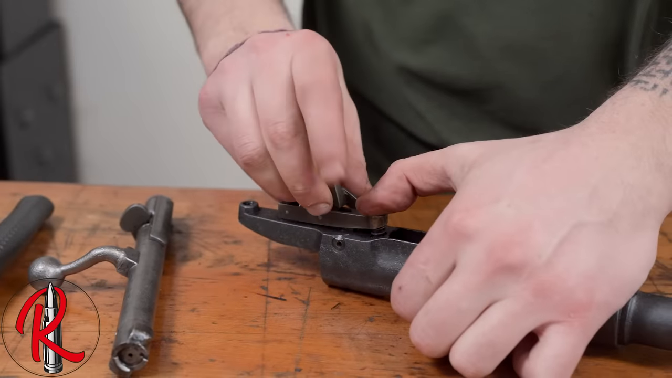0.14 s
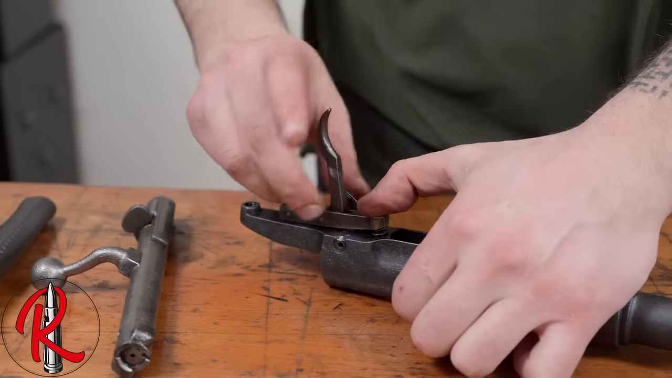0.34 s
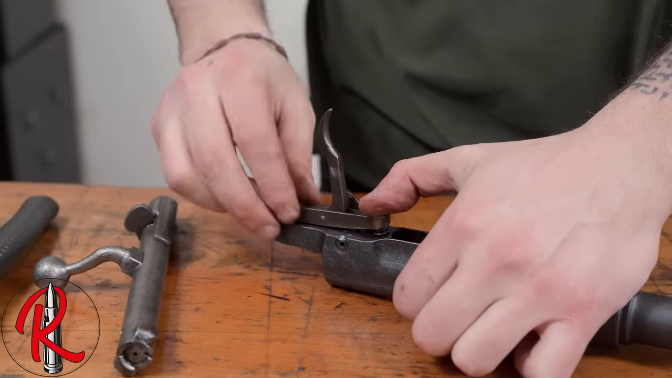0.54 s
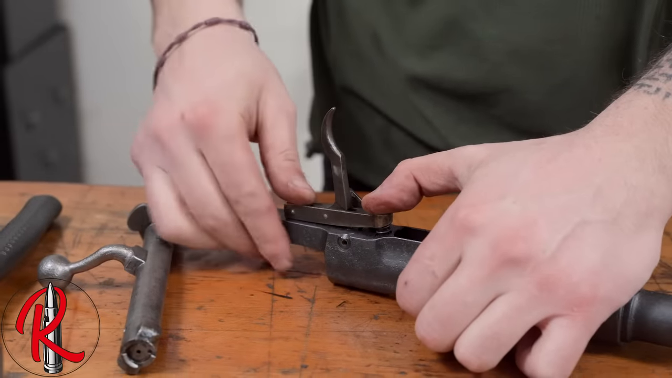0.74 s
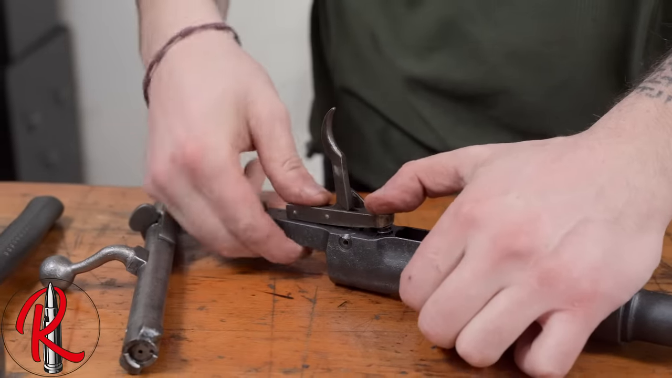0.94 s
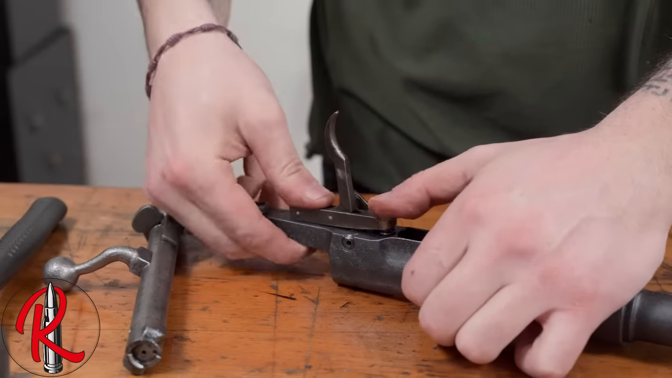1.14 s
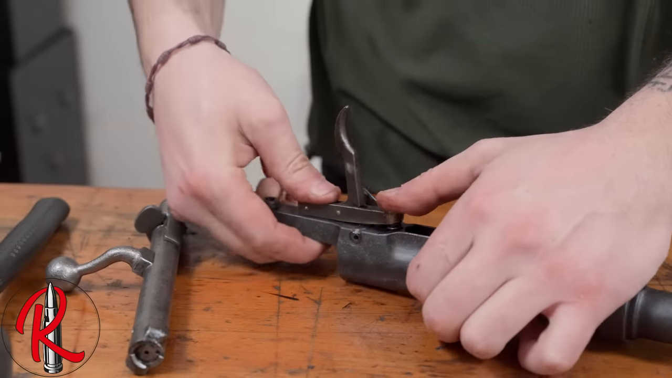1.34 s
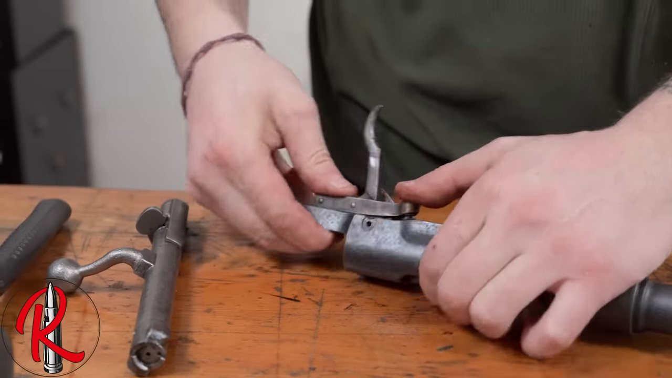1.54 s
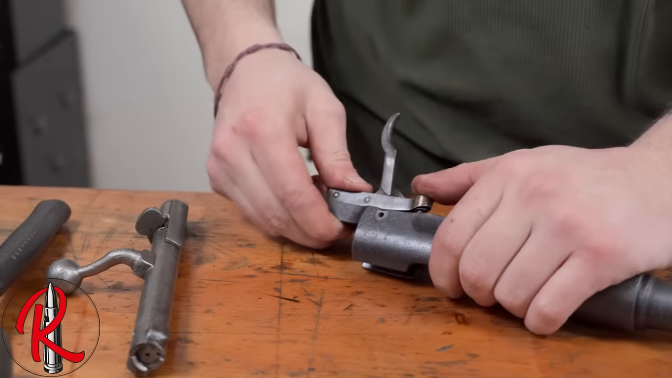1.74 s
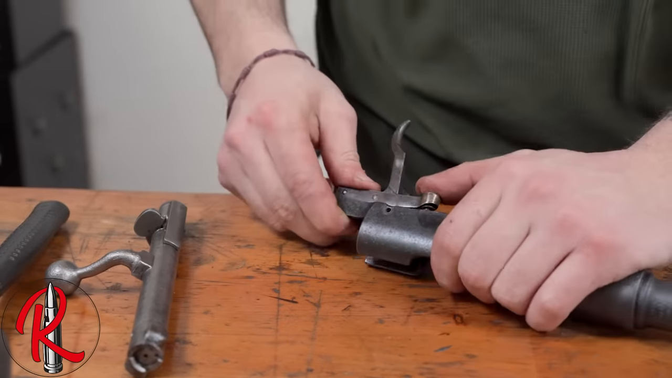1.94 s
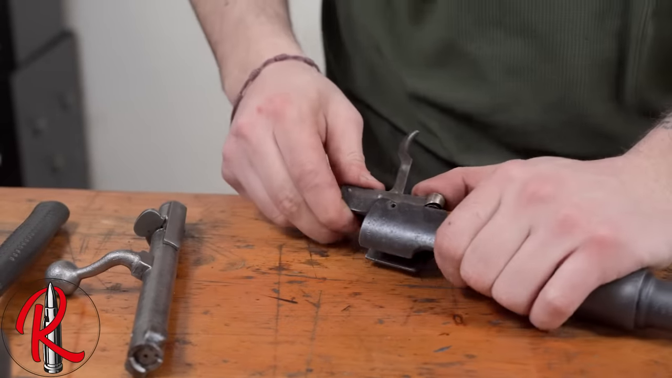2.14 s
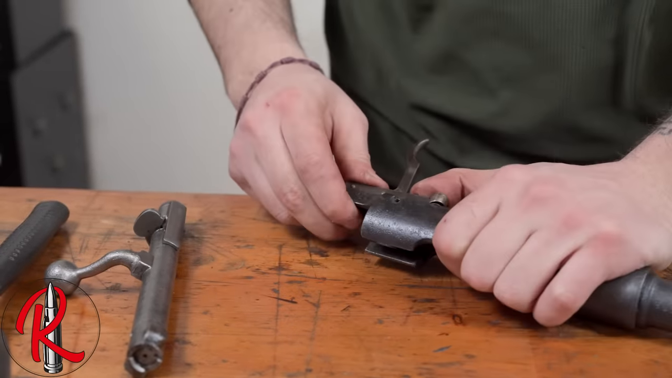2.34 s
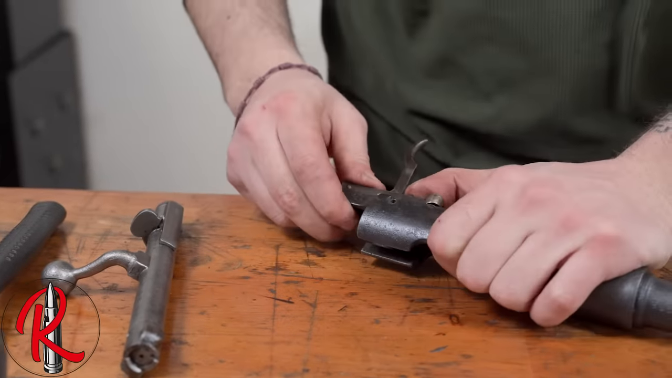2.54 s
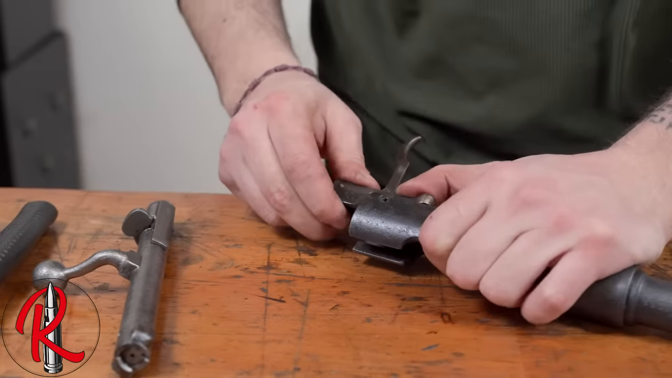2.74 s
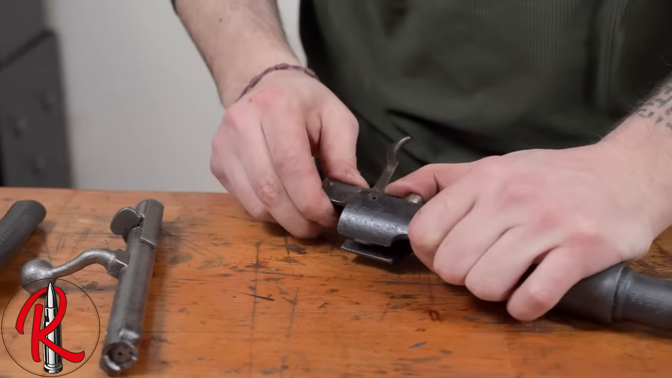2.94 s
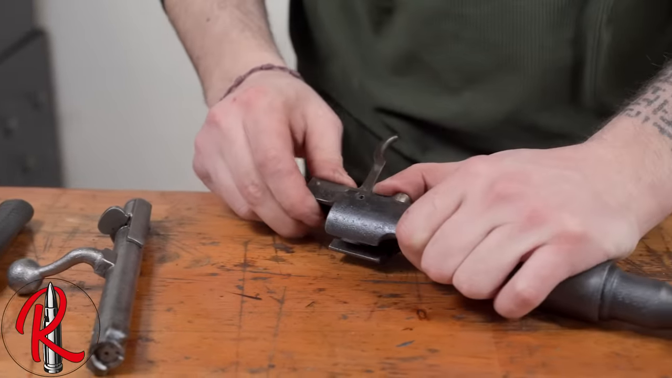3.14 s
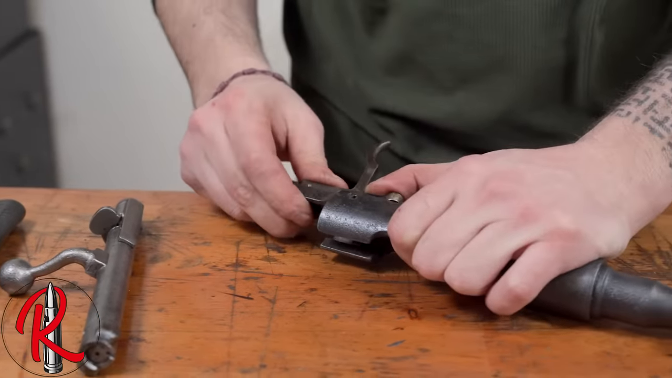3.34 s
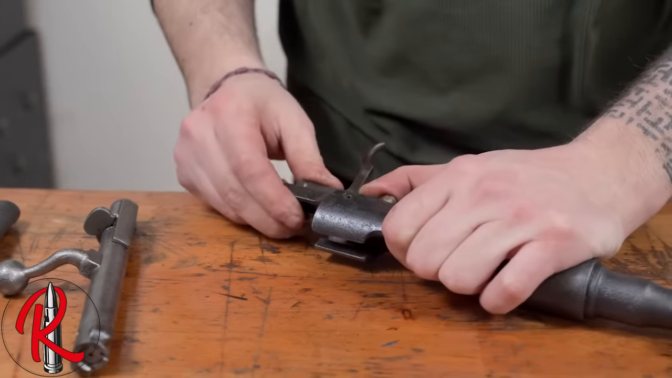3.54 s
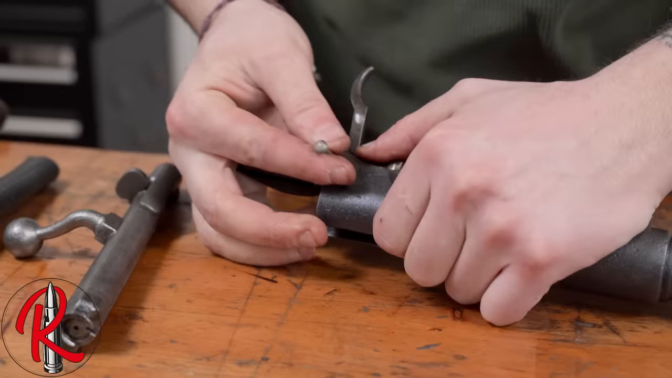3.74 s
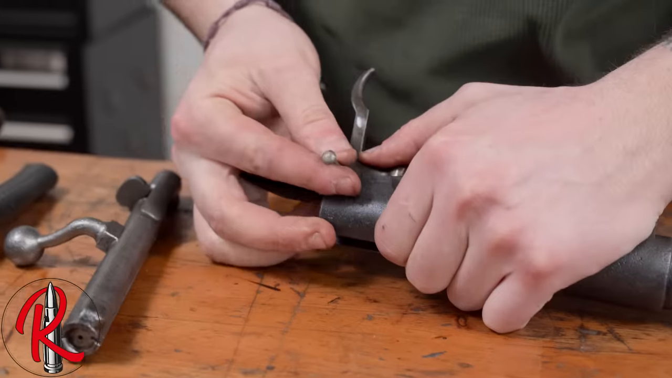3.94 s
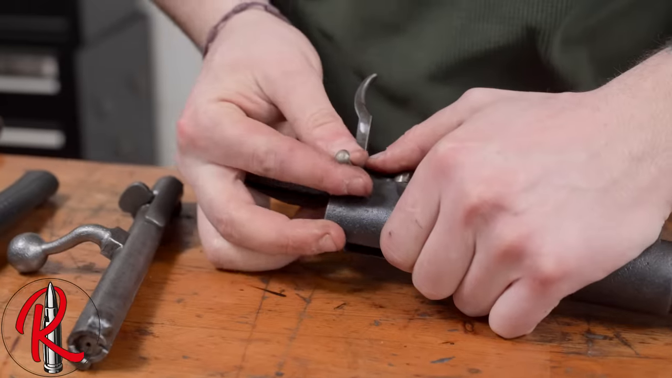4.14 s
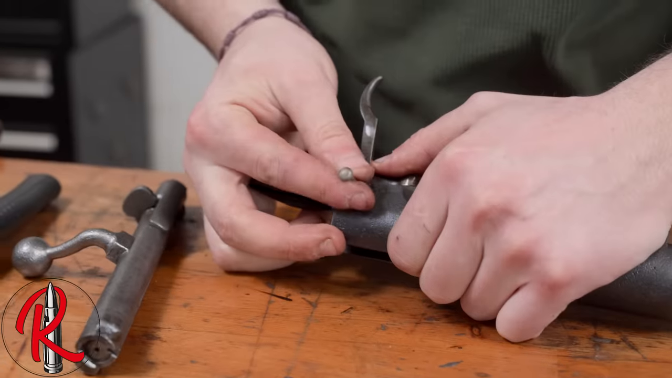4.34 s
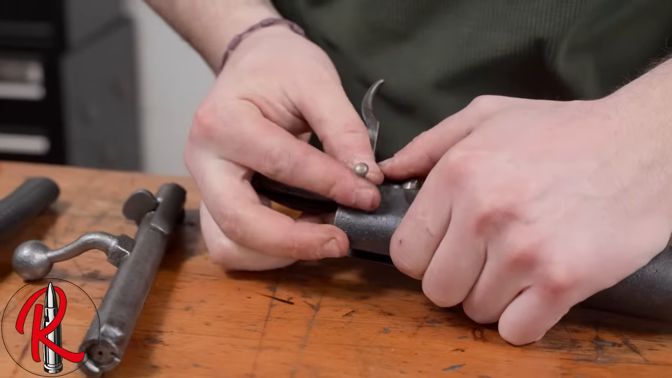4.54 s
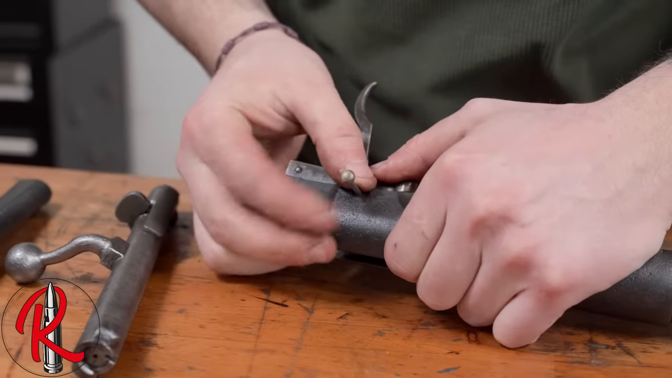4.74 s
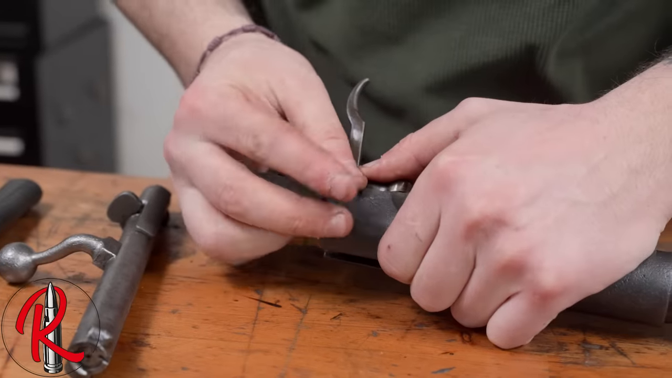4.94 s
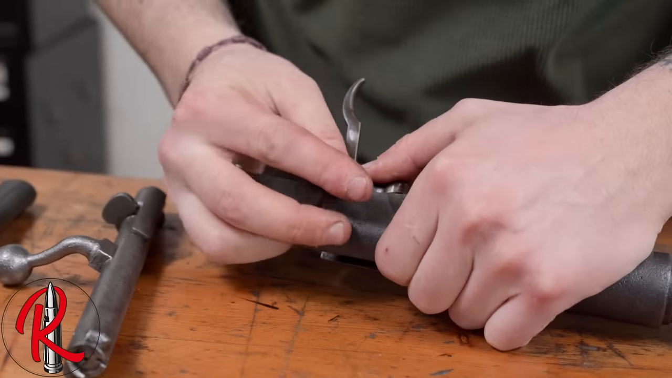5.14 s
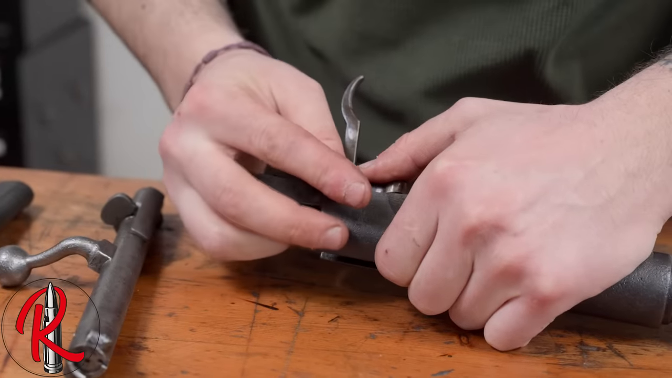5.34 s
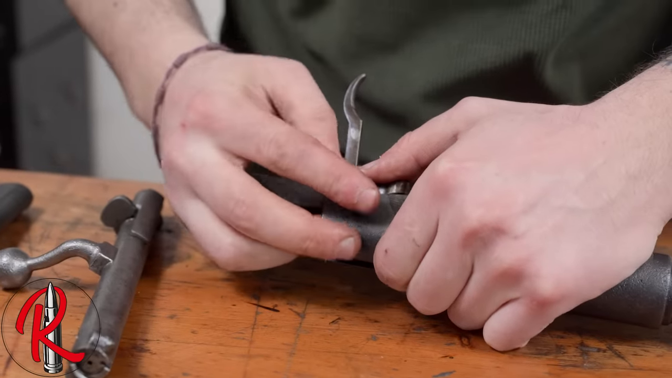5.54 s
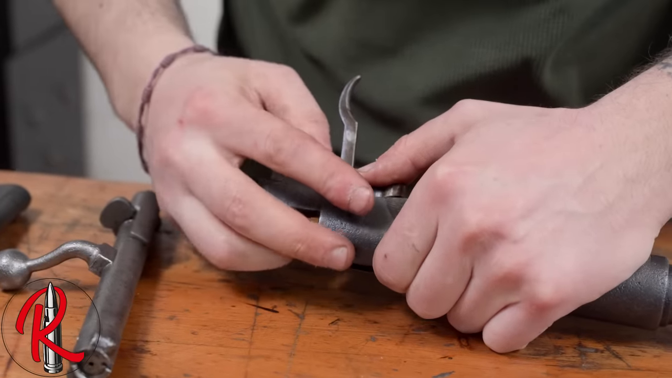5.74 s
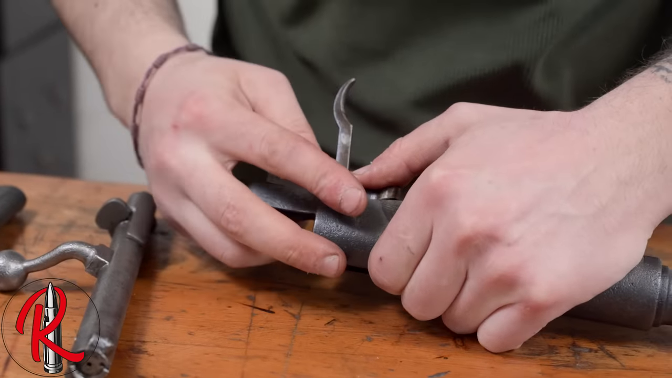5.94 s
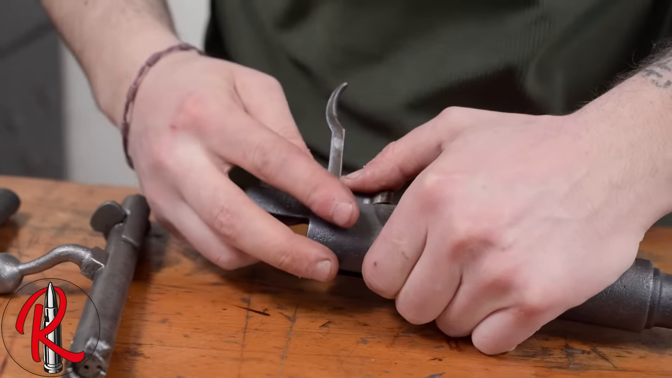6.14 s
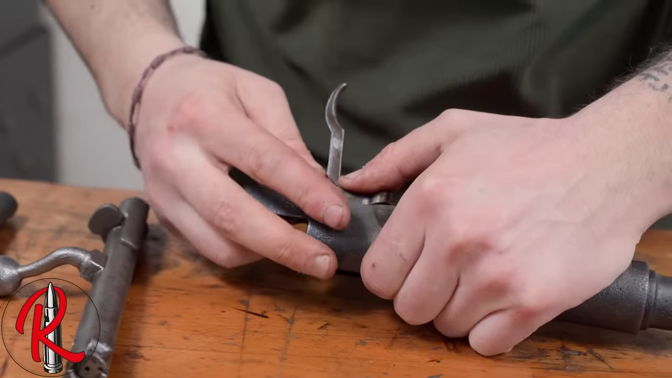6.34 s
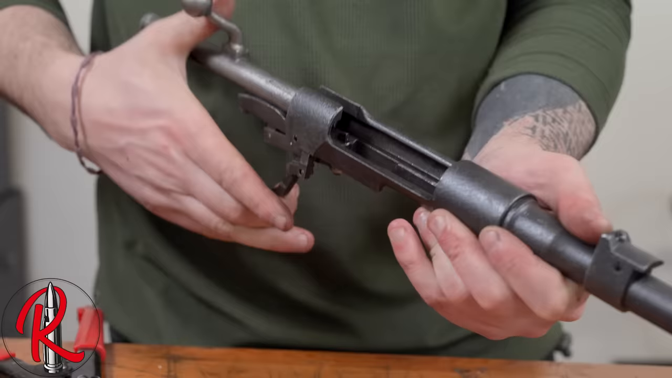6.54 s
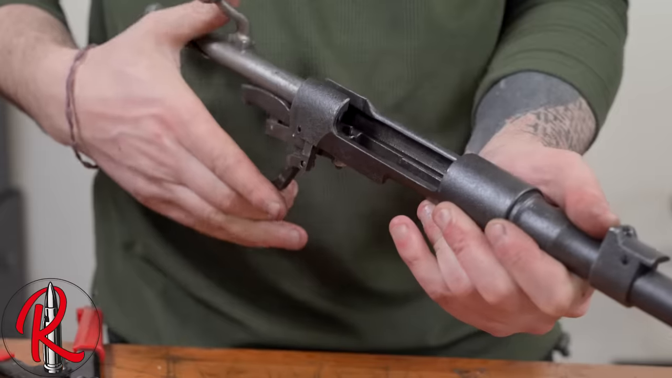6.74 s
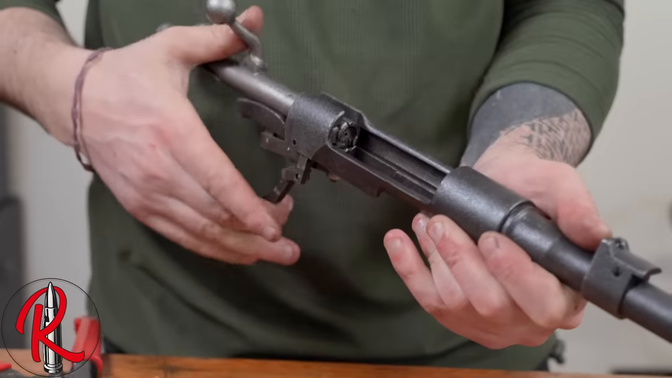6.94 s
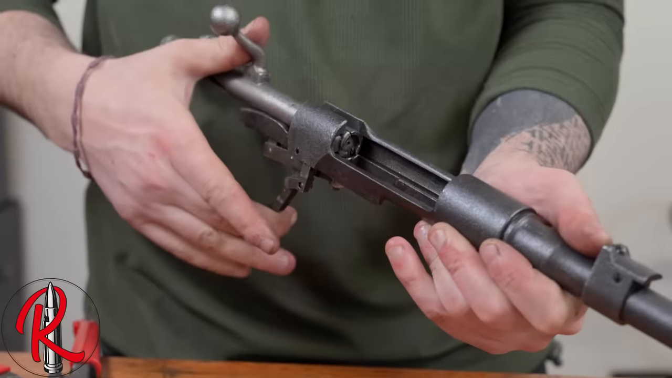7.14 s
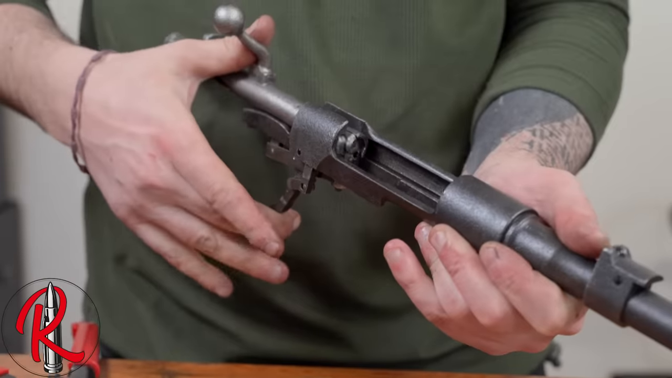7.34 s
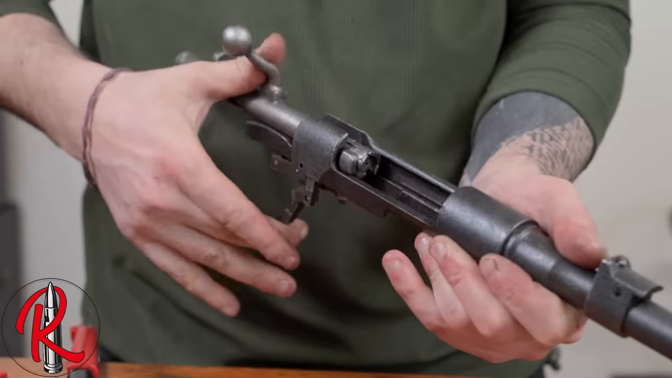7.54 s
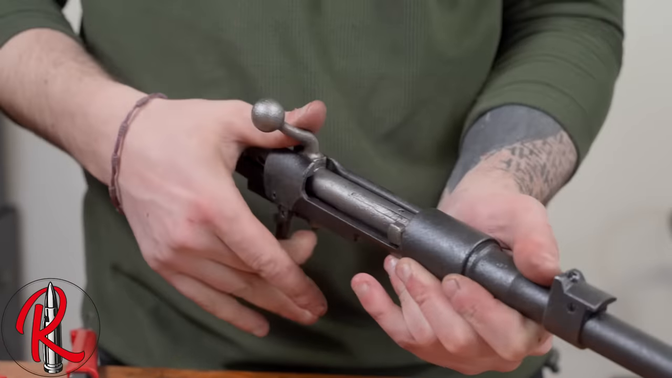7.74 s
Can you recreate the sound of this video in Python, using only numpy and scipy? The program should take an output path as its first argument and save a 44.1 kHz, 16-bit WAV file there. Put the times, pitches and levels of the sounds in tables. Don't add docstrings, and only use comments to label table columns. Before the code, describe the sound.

Sparse handling of loose steel over a workbench: dull taps, faint fingertip rubs, then a heavy wooden knock as the receiver lands and bounces. Finer ticks and a spring snap lead to one sharp, squeaking pin click. After a quiet pause the bolt enters with a gritty clatter, eases along its guide and slams home in a dense metallic crack. Close microphone, short dark room echo, quiet hiss and low rumble.

```python
import sys
import numpy as np
from scipy import signal
from scipy.fft import rfft, irfft, next_fast_len
from scipy.io import wavfile
from scipy.ndimage import uniform_filter1d

SR = 44100
rng = np.random.default_rng(int(sys.argv[2]) if len(sys.argv) > 2 else 0)


def master_out(mix):
    frames = np.transpose(np.atleast_2d(mix))
    ceiling = np.clip(frames, -1, 1)
    pcm = np.round(ceiling * 32767).astype(np.int16)
    wavfile.write(sys.argv[1], SR, pcm)


def volts(x):
    e = np.asarray(x, float) / 20
    return 10 ** e


N = 343980
LEAD = 4410

# pitch in Hz, level in dB, ring time t60 in seconds.
RECEIVER_RINGS = [(1460, -8.5, 0.029), (2080, -11, 0.045), (2540, -14.5, 0.12), (2880, -12, 0.032),
                  (3550, -4.5, 0.057), (3746, -13.5, 0.027), (3910, -0.5, 0.031), (4420, -6, 0.069),
                  (4700, -6.5, 0.027), (5060, -9.5, 0.028), (5840, -14.5, 0.061), (5800, -14.5, 0.018),
                  (6360, -43, 0.042), (7940, 5, 0.028), (7460, -3, 0.02), (8500, 3, 0.03),
                  (9300, -1, 0.033), (9340, 2.5, 0.0023), (12200, 6, 0.012), (12000, -7, 0.0094),
                  (12740, 5, 0.0212), (14700, -17, 0.014)]
# pitch in Hz, width in Hz, level in dB.
ENTRY_RINGS = [(970, 60, -2), (1620, 51, -6), (2090, 140, -1.5), (2500, 94, -7.5), (3110, 500, -12),
               (3700, 52, -3.5), (3880, 80, 4), (4230, 55, -5), (4390, 60, -1), (4530, 55, -6),
               (4980, 54, -2), (5210, 54, -1.5), (5800, 90, -5), (6440, 250, -8), (6900, 150, -2.5),
               (7817, 130, -7), (8300, 600, -3.5), (11340, 68, -14.5), (12100, 390, -13)]
# pitch in Hz, width in Hz, level in dB.
HOME_RINGS = [(1013, 410, -8), (1620, 160, -7.5), (2000, 54, -3), (2250, 214, -2), (3610, 170, -6.5),
              (3990, 55, -2.5), (4230, 90, 0.5), (4540, 78, -1), (4850, 97, -1), (5060, 80, -4.5),
              (5420, 110, -5), (5710, 60, -5), (6670, 96, -3), (7090, 170, -4), (8000, 260, 6),
              (8430, 480, 10), (10200, 810, 8), (11500, 1600, 6), (13500, 670, -12)]
# time in seconds, level at 3-6.5 kHz in dB.
PUSH_HOME = [(7.595, -87), (7.63, -86), (7.666, -68.5), (7.672, -55.5), (7.684, -48), (7.7, -38.5),
             (7.72, -34), (7.728, -30.5), (7.737, -38.5), (7.755, -38.5), (7.77, -44.5), (7.8, -47)]


def band(x, lo_hz, hi_hz, order=2):
    return signal.sosfilt(signal.butter(order, [lo_hz, min(hi_hz, .48 * SR)], "band", fs=SR, output="sos"), x)


def unit(x):
    return x / np.sqrt(np.mean(x ** 2))


def peak(x, db):
    return x * volts(db) / np.max(np.abs(x))


def add(out, x, s):
    i = int(s * SR) + LEAD
    out[i:i + len(x)] += x[:len(out) - i]


def along(tables, column):
    gain, t = np.zeros(N + LEAD), (np.arange(N + LEAD) - LEAD) / SR
    for table in tables:
        rows = np.array(table, float)
        on = slice(*np.searchsorted(t, rows[[0, -1], 0]))
        gain[on] += volts(np.interp(t[on], rows[:, 0], column(rows)))
    return uniform_filter1d(gain, size=66)


def walk(rate, size=N + LEAD):
    k = int(SR / rate)
    steps = np.repeat(rng.standard_normal(size // k + 1), k)
    return unit(uniform_filter1d(steps, size=k)[:size])


def rings(modes, chance, size, scatter_db, detune):
    hz, db, t60 = np.transpose(modes)[:, :, None]
    t, m = np.arange(size) / SR, len(modes)
    level = volts(db + scatter_db * chance[:m, None])
    swing = np.sin(2 * np.pi * hz * (1 + detune * chance[m:2 * m, None]) * t)
    sign = np.sign(chance[2 * m:3 * m, None])
    return level * sign * swing * np.exp(-np.log(1000) * t / t60)


def grit(per_s, spread_db, size=N + LEAD):
    hit, luck, sign = rng.random((3, size))
    return unit((hit < per_s / SR) * volts(-spread_db * np.log(luck + 1e-9)) * np.sign(sign - .5))


def hum(force, part):
    return sum(volts(db) * signal.lfilter(*signal.iirpeak(hz, hz / width, SR), force) / np.sqrt(width)
               for hz, width, db in part)


def background():
    # frequency in Hz, density in dB per Hz.
    hiss_tone = [(29, -34), (50, -0.5), (125, -9), (188, -7.5), (304, -12), (351, -16), (425, -12.5),
                 (503, -12.5), (610, -6.5), (1060, -21), (2130, -23.5), (3060, -25.5), (3620, -24.5),
                 (6920, -33.5), (15700, -45.5)]
    # time in seconds, level at 400-900 Hz in dB.
    hiss_level = [(0, -86), (2.3, -88.5), (3.7, -89), (5.3, -89), (6.5, -87.5), (6.7, -93.5), (7.8, -91)]
    # time in seconds, pitch in Hz, level in dB.
    engine = [(0.0, 42.2, -71.5), (0.361, 43.1, -71.5), (0.818, 43.56, -64.5), (2.712, 46.1, -76.5),
              (3.43, 47.07, -84), (3.729, 47.6, -77), (3.84, 41.9, -85), (3.9, 39.7, -87.5)]
    # time in seconds, level in dB.
    rumble_level = [(0, -67), (2.4, -66.5), (3.9, -65), (5.2, -68.5), (5.6, -65.5), (7, -68), (7.8, -72.5)]
    t = (np.arange(N + LEAD) - LEAD) / SR
    size = next_fast_len(N + LEAD)
    f = np.maximum(np.arange(size // 2 + 1) * SR / size, 1)
    tone_hz, tone_db = np.transpose(hiss_tone)
    tone = volts(np.interp(np.log(f), np.log(tone_hz), tone_db))
    hiss = irfft(rfft(rng.standard_normal(size)) * tone, size)[:N + LEAD]
    hiss *= volts(np.interp(t, *np.transpose(hiss_level)) + 1.1 * walk(3)) / np.std(band(hiss, 400, 900))

    s, hz, db = np.transpose(engine)
    engine_db = np.interp(t, s, db)
    phase = 2 * np.pi * np.cumsum(np.interp(t, s, hz) * (1 + 0.021 * walk(2.8))) / SR
    fade = np.clip((s[-1] - t) * 5, 0, 1)
    drone = np.sqrt(2) * np.sin(phase) * volts(engine_db + 1.9 * walk(2.8)) * fade
    roar_db = -91.5 + 0.25 * (engine_db + 77.0) + 5.6 * walk(5)
    roar = unit(band(rng.standard_normal(N + LEAD), 90, 400)) * volts(roar_db) * (t < s[-1])

    rumble = unit(band(rng.standard_normal(N + LEAD), 14, 27, order=3))
    rumble *= volts(np.interp(t, *np.transpose(rumble_level)) + 2 * walk(4))
    return hiss + drone + roar + rumble


def click(part, db, low_db, high_db, top_db, spot_hz, spot_db=7, crack_s=0.0012, crack=0.89, chatter_s=0.00062):
    chance = rng.standard_normal(4096)
    t = np.arange(4096) / SR
    hz, sound = np.array(part)[:, 0], 0
    favour = volts(spot_db * np.exp(-(np.log(hz / spot_hz) / 0.045) ** 2))[:, None]
    favour[hz < 2200] *= volts(min(low_db + 12, 0))
    modes = favour * rings(part, chance, size=4096, scatter_db=1.66, detune=0.009)
    chatter = (1 + .6 * chance[200:328]) * np.exp(-t[:128] / chatter_s) * (np.arange(128) % 37 == 0)
    ranges = ((1200, 3000, low_db), (3000, 7000, 0), (7000, 10500, high_db), (10500, 15500, top_db))
    for lo, hi, gain_db in ranges:
        ring = np.convolve(modes[(hz >= lo) & (hz < hi)].sum(axis=0), chatter)[:4096]
        snap = band(chance[::-1] * np.exp(-t / crack_s), max(lo, 1900), min(hi, 14000), order=3)
        blend = peak(ring, 0) + crack * min(lo / 4000, 1) * peak(snap, 0)
        sound = sound + peak(blend, db + gain_db)
    return sound


def clicks():
    # time in seconds, peak at 3-7 kHz in dB,
    # sharpness in dB, ring favoured by the spot struck in Hz.
    trigger_taps = [(0.3083, -71, -11, 4500), (0.3844, -70, -24, 5130), (0.3977, -55, -19.5, 4700),
                    (0.6209, -74.5, 0, 2080), (0.829, -78, 6, 1920), (0.9309, -46, -31, 1460),
                    (1.0352, -47.5, -14, 2050), (1.0935, -52, -33, 5800), (1.384, -70, -13, 3920),
                    (2.348, -49.5, -14, 3910), (1.9945, -70.5, -12, 2500), (2.575, -73.5, -11, 2890),
                    (2.556, -80, -15, 4420), (2.6894, -72, -7.5, 2140), (2.7794, -81.5, -16.5, 2110),
                    (2.8201, -73.5, -11, 2074), (3.2087, -72, -29.5, 3730), (3.234, -66.5, -10, 3960),
                    (3.2588, -68, -22, 3620), (3.6172, -67.5, -5.5, 2120)]
    spring_ticks = [
        (3.8486, -68, 12, 5100),
        (3.9044, -83, 3, 3670),
        (4.034, -93.5, 2, 11900),
        (4.066, -76.5, -2, 3550),
        (4.102, -75, -8, 3550),
        (4.1095, -71, -20, 3550),
        (4.121, -81, 0, 4400),
        (4.3343, -48, -5, 5620),
        (4.3432, -43.5, 6, 11900),
    ]
    pin_snaps = [(3.8601, -58.5, -6, 5100), (4.2233, -67, -21, 3520), (5.1037, -61, 2, 5620),
                 (5.1288, -38, 4.5, 5100), (5.1594, -43, -2, 6610), (5.218, -54, -11.5, 3760),
                 (5.557, -44.5, -1, 7540), (5.5645, -29.5, -4.5, 4400), (5.5662, -26, -14, 5620),
                 (5.9585, -56.5, -22, 3760), (6.4394, -75.5, -20.5, 3610)]
    bolt_hits = [(6.8794, -78, -25.5, 3990), (6.9375, -43.5, -25, 3880), (6.941, -40, -24, 5210),
                 (6.9492, -37.5, -3.5, 6900), (6.954, -38, -17.5, 4390), (6.9835, -41, -14.5, 3880),
                 (6.9975, -40.5, -6.5, 3880), (7.007, -43.5, -5, 5800), (7.2394, -86, -16, 2090),
                 (7.2609, -68, -17, 3940), (7.4724, -57, -5.5, 3920), (7.6271, -48.5, -3, 6670),
                 (7.6334, -52.5, -4, 3910), (7.6702, -43, -12, 3990), (7.6926, -35.5, -3, 4230),
                 (7.7006, -33, -3, 2000), (7.7101, -38, -1, 4230), (7.7232, -19, -3.5, 5420),
                 (7.7266, -17, -5.5, 4550), (7.7286, -18, -7, 4850), (7.7312, -33, -10, 2250),
                 (7.7414, -32, 9, 7090), (7.7472, -33, -8.5, 4540), (7.7615, -34, -17, 5060)]
    # pitch in Hz, level in dB, ring time t60 in seconds.
    gripped = [(2507, -13, 0.047), (3550, -2.5, 0.051), (3760, -6, 0.039), (4120, -7, .02),
               (4400, -5.5, .025), (4730, -11.5, .02), (5100, -11, .03), (5620, -6, .025),
               (6610, -9.5, .04), (7540, -11, .02), (7970, -1, 0.018), (8760, -5.5, .03), (9600, -1, .01),
               (10900, -7.5, .03), (11900, 0, .01), (12500, -5.5, .018), (14700, -14, .008)]
    # low rings dB, high and top rings dB over sharpness, lowest sound radiated Hz,
    # share of the free ring time left by the grip
    kinds = ((trigger_taps, (-8, 2, -15, 908.5, 1.24)), (spring_ticks, (-31.5, -8.5, 3.5, 2303, 0.7)),
             (pin_snaps, (-18.5, 2, -5, 2099.5, 0.9)), (bolt_hits, (-11, 0.5, -5.5, 1450, 1.04)))
    grip_from_s, bolt_from_s = 3.7, 6.6
    out = []
    for rows, (low_db, high_db, top_db, lowest_hz, free) in kinds:
        for s, db, sharp_db, spot_hz in rows:
            bolt_rings = ENTRY_RINGS if s < PUSH_HOME[0][0] else HOME_RINGS
            bolt = [(hz, g, 2.0 / width) for hz, width, g in bolt_rings]
            part = RECEIVER_RINGS if s < grip_from_s else gripped if s < bolt_from_s else bolt
            held = np.array(part) * [1, 1, free]
            lift_db = 6.5 * (spot_hz < 3200)
            sound = click(held, db, low_db + lift_db, high_db + sharp_db, top_db + sharp_db, spot_hz)
            out.append((s + 0.0004, band(sound, lowest_hz, 26000, order=4)))
    return out


def knock(db, thud_db, short_db, crack_db, deep_db, thud_hz, contact_ms=0.68, spot_hz=680, spot_db=9,
          thud_s=0.0057, crack_s=0.0068, crack_hz=1600):
    # pitch in Hz, level in dB, ring time t60 in seconds.
    board_rings = [(124, -10, 0.18), (142, -9.5, 0.04), (214, 2.5, 0.045), (318, -1.5, 0.034),
                   (344, -6, 0.085), (507, -10.5, 0.06), (552, -8, 0.065), (658, -2.5, 0.011),
                   (793, -2.5, 0.019), (983, -3.5, 0.013), (1235, -5.5, 0.015), (1410, -7, 0.046),
                   (1640, -17, 0.015)]
    hz, m = np.array(board_rings)[:, 0], len(board_rings)
    chance = rng.standard_normal(4096)
    t = np.arange(4096) / SR
    push = np.hanning(int(contact_ms * SR / 1000) + 3)
    chance[2 * m:3 * m] = np.where(np.arange(m) % 2, 1, -1)
    modes = rings(board_rings, chance, size=4096, scatter_db=1, detune=.008)
    modes[hz < 180] *= volts(deep_db)
    modes *= volts(spot_db * np.exp(-np.log(hz[:, None] / spot_hz) ** 2 / 0.037))
    deep = hz < 420
    boards = peak(modes[deep].sum(axis=0), db) + peak(modes[~deep].sum(axis=0), db + short_db)
    thud = np.sin(2 * np.pi * thud_hz * t) * t * np.exp(-t / thud_s)
    burst = (.5 * chance[::-1] + 9 * (t == 0)) * np.exp(-t / crack_s)
    crack = band(band(burst, 800, crack_hz, order=1), 800, 4500)
    return np.convolve(boards, push / push.sum())[:4096] + peak(thud, db + thud_db) + peak(crack, db + crack_db)


def knocks():
    # time in seconds, peak of the deep boards in dB, hardness in dB.
    drops = [
        (2.347, -26.5, -1),
        (2.361, -43, -6.5),
        (2.384, -28.5, -24),
        (2.542, -41.5, -13),
        (2.581, -44.5, -23),
    ]
    # time in seconds, peak of the deep boards in dB, hardness in dB,
    # board ring nearest the spot in Hz.
    taps = [(0.394, -67.5, 2, 344), (0.616, -73, 11.5, 1410), (0.756, -58, -31, 214),
            (0.8245, -53, 20.5, 705), (0.87, -74, 8, 715), (0.929, -48.5, 9.5, 1410),
            (1.035, -58.5, 7.5, 344), (1.094, -66, -7, 344), (1.852, -77.5, 19, 744),
            (5.559, -64, 10.5, 513), (5.652, -80, 8, 810), (6.54, -75, 7.5, 300), (6.965, -56, 4, 983),
            (7.019, -52, -1.5, 214), (7.235, -73.5, 6.5, 983), (7.452, -48.5, -27, 344),
            (7.468, -51, -10, 214), (7.64, -51.5, -20, 330), (7.725, -54.5, 13, 1235)]
    # time in seconds, peak of the deep boards in dB,
    # hardness in dB, thud pitch in Hz.
    bumps = [
        (0.931, -60.5, 3, 49.6),
        (2.293, -58, -0.5, 49.6),
        (4.343, -79.5, 7, 96),
        (4.644, -75, -3.5, 77.8),
        (5.558, -53.5, 0, 89.7),
        (5.653, -61, 1, 63),
        (5.797, -75.5, 3.5, 59.6),
        (6.54, -64.5, -6, 66.5),
        (7.26, -64.5, -5, 111.5),
        (7.724, -55, -12, 98.6),
    ]
    # thud, short boards, crack, slowest boards (dB); then thud Hz, contact ms
    blows = [(s, db, -30, hard, hard - 0.5, 2, 121, 0.31) for s, db, hard in drops]
    blows += [(s, db, -29.5, hard, hard / 2 - 8, -15, 55, 0.82, spot) for s, db, hard, spot in taps]
    blows += [(s, db, 7, hard, hard - 1.5, -3.5, hz, 1) for s, db, hard, hz in bumps]
    knock_delay_s = 0.003
    return [(s + knock_delay_s, knock(*blow)) for s, *blow in blows]


def rubs():
    # start, firmest moment and end in seconds,
    # level at 2.5-8 kHz in dB, level above 8 kHz in dB.
    strokes = [(0.584, 0.688, 0.71, -77, -100), (0.738, 0.814, 0.82, -74, -99),
               (0.786, 0.835, 0.92, -75, -93), (0.903, 0.915, 0.954, -68, -74),
               (1.242, 1.282, 1.83, -86, -103), (1.506, 1.597, 1.632, -65.5, -88),
               (1.53, 1.663, 1.77, -76, -75), (1.682, 1.813, 2.26, -88.5, -101),
               (1.966, 2.025, 2.06, -83, -102), (2.232, 2.35, 2.31, -82, -100),
               (2.59, 2.645, 2.53, -84, -108), (3.173, 3.251, 3.2, -82.5, -102),
               (3.547, 3.59, 3.8, -92.5, -106), (3.85, 3.85, 4.3, -89, -94), (3.97, 4.053, 4.2, -92, -92),
               (4.355, 4.38, 4.7, -101, -94), (4.414, 4.479, 4.75, -94.5, -93.5),
               (4.836, 4.994, 5.8, -99, -99.5), (5.762, 5.817, 5.86, -80.5, -100),
               (6.153, 6.173, 6.3, -93, -112)]
    force = grit(per_s=36000, spread_db=3.0) * volts(1.6 * walk(64))
    ring = signal.lfilter(*signal.iirpeak(3880, 45, SR), force)
    skin = unit(band(band(force, 3000, 13000, order=1), 1500, 10000))
    body = unit(skin + 0.3 * unit(band(force, 780, 1400)) + .15 * unit(ring))
    fine = unit(band(force, 9000, 12800, order=4))
    fade = -20.5 * np.array([1, 0.85, 0, 0.85, 1])
    press = [np.transpose([[a, (a + b) / 2, b, (b + c) / 2, c], db + fade, fine_db + fade])
             for a, b, c, db, fine_db in strokes]
    return along(press, lambda r: r[:, 1]) * body + along(press, lambda r: r[:, 2]) * fine


def squeak(db, hz, swell_s, fade_s):
    t = np.arange(13230) / SR - .1
    shape = (t / np.where(t < 0, swell_s, fade_s)) ** 2
    rough = unit(band(rng.standard_normal(len(t)), 3.85 * hz, 4.1 * hz))
    waver = volts(min(fade_s * 150, 3) * walk(90, size=len(t)))
    song = np.sin(2 * np.pi * hz * t) * np.exp(-shape)
    if db > -40:
        song = song + volts(-17.5) * rough * np.exp(-shape / 2.2 ** 2)
    return volts(db) * waver * song


def squeaks():
    # loudest moment in seconds, peak in dB, pitch in Hz, swell in seconds, fade in seconds.
    songs = [
        (5.5625, -27, 3720, .0024, .0026),
        (1.76, -86, 3900, .05, .08),
        (2.263, -76, 2380, .003, .003),
        (2.42, -72, 3920, .004, .006),
        (2.635, -84, 3900, .02, .012),
        (0.8, -78, 3950, .006, .006),
    ]
    out = np.zeros(N + LEAD)
    for s, *song in songs:
        add(out, squeak(*song), s - .1)
    return out


def slides(tables, part, low_db, high_db, between, body_db):
    # pitch in Hz, width in Hz, level in dB.
    stock = [(215, 12, 0.5), (330, 38, -1.5), (575, 50, -6.5), (900, 40, -12.5)]
    start = int(tables[0][0][0] * SR)
    end = min(int((tables[-1][-1][0] + .3) * SR) + LEAD, N + LEAD)
    force = grit(per_s=11000, spread_db=2.0, size=end - start) * volts(2.2 * walk(200, size=end - start))
    out = along(tables, lambda r: r[:, 2])[start:end] * unit(band(hum(force, stock), 160, 1300))
    gain = along(tables, lambda r: r[:, 1])[start:end]
    out += volts(body_db) * gain * unit(band(force, 360, 1350))
    for lo, hi, db in ((900, 3000, low_db), (3000, 6500, 0), (6500, 14500, high_db)):
        ring = hum(force, [row for row in part if lo <= row[0] < hi])
        hiss = unit(band(force, max(lo, 1800), min(hi, 12500), order=3))
        out += volts(db) * gain * unit(unit(band(ring, 0.38 * lo, 1.4 * hi)) + between * hiss)
    return np.pad(out, (start, N + LEAD - end))


def stroke(s, length_s, db, boards_db):
    when = s + length_s * np.array([0, 0.14, 1 - 0.27, 1])
    level = db - 28.5 * np.array([1, 0, 0, 1])
    return np.transpose([when, level, (level + db) / 2 + boards_db])


def scrapes():
    # time in seconds, level at 3-6.5 kHz in dB.
    rattle = [(2.349, -60), (2.365, -75), (2.42, -77), (2.45, -88), (2.53, -99)]
    # time in seconds, level at 3-6.5 kHz in dB.
    enter = [(6.915, -83), (6.93, -65), (6.939, -63), (6.952, -51.5), (6.97, -49), (6.99, -49),
             (7.012, -48), (7.022, -64), (7.05, -76.5), (7.1, -95)]
    # start in seconds,
    # length in seconds, level at 3-6.5 kHz in dB, boards over that in dB.
    pin_slides = [
        (4.328, .018, -66.5, -28),
        (5.094, 0.028, -72, -24.5),
        (5.553, .018, -46, -14),
    ]
    guide_slides = [
        (7.25, 0.099, -104, 27.4),
        (7.345, 0.057, -94, 13),
        (7.412, 0.11, -73, 4.2),
        (7.45, 0.091, -105, 27.6),
    ]
    # low rings dB, high rings dB, share of hiss between the rings, wooden body dB
    long_scrapes = ((rattle, ENTRY_RINGS, (-0.5, -12, 1, -6.5)), (enter, ENTRY_RINGS, (-5.5, -13, 0.4, -11)),
                    (PUSH_HOME, HOME_RINGS, (-6, -6.5, 0.24, -22.5)))
    short_scrapes = ((pin_slides, ENTRY_RINGS, (-12.5, -6, 5.5, -35)),
                     (guide_slides, HOME_RINGS, (-1, -4.5, .05, -32)))
    out = 0
    for rows, part, colour in long_scrapes:
        s, db = np.transpose(rows)
        boards_db = -66.5 + 0.21 * (db + 51)
        out = out + slides([np.transpose([s, db, boards_db])], part, *colour)
    for rows, part, colour in short_scrapes:
        out += slides([stroke(*row) for row in rows], part, *colour)
    return out


def room(x, gap_s=0.0021, build_s=0.003, tones_db=2, tones_build_s=0.093):
    # frequency in Hz, decay time t60 in seconds, level in dB.
    decay = [(70, 0.97, -12.5), (207, 0.38, -0.5), (590, 0.54, -3.5), (1812, 0.47, -8), (4550, .42, -9),
             (8350, 0.098, -12.5), (13900, 0.28, -21)]
    # pitch in Hz, level in dB, decay time t60 in seconds.
    standing = [(125, -5, 0.47), (155, -1, 0.75), (215.2, 1.5, 0.42), (230, -8, 0.2), (277, -4, .4)]
    t = np.arange(SR // 2 + 8000) / SR
    hz, t60, db = np.transpose(decay)
    echo = 0
    for centre in 50 * 2 ** np.arange(0, 8.5, .5):
        die_s = np.interp(np.log(centre), np.log(hz), t60)
        level_db = np.interp(np.log(centre), np.log(hz), db)
        noise = band(rng.standard_normal(len(t)), centre / 2 ** .25, centre * 2 ** 0.27)
        tail = noise * np.exp(-np.log(1000) * t / die_s)
        echo = echo + volts(level_db) * tail * np.sqrt(2 * np.log(1000) / (die_s * SR))
    echo = echo * (1 - np.exp(-np.maximum(t - gap_s, 0) / build_s))
    tones = rings(standing, np.ones(15), size=len(t), scatter_db=-5.0, detune=0).sum(axis=0)
    echo = echo + volts(tones_db) * tones * (1 - np.exp(-(t / tones_build_s) ** 2)) * 100 / SR
    return signal.fftconvolve(x, echo)[:len(x)]


def scene():
    # time in seconds, steel peak in dB, boards peak in dB.
    earlier = (-0.02, -40, -54.5)
    # pitch in Hz, width in Hz, share withheld.
    aimed = [(3620, 270, 0.4), (2500, 250, 0.4)]
    # time in seconds, peak in dB, top frequency in Hz.
    tick = (3.7555, -53, 3500)
    work = scrapes() + rubs()
    s, steel_db, boards_db = earlier
    steel = click(RECEIVER_RINGS, steel_db, low_db=-4.0, high_db=-14.0, top_db=-44, spot_hz=3550)
    bench = knock(boards_db, thud_db=-20, short_db=13.0, crack_db=16.9, deep_db=-16, thud_hz=83)
    add(work, steel + bench, s)
    for s, sound in clicks() + knocks():
        add(work, sound, s)
    sung = squeaks()
    spread = work - sum(share * signal.lfilter(*signal.iirpeak(hz, hz / width, SR), work)
                        for hz, width, share in aimed)
    air = background()
    tick_s, tick_db, top_hz = tick
    add(air, peak(band(np.arange(256) == 0, 40, top_hz), tick_db), tick_s)
    echo = room(spread + volts(-9) * sung)
    return (work + sung + echo + air)[None, LEAD:]


def low_pass(x):
    return signal.sosfilt(signal.butter(12, 15830, fs=SR, output="sos"), x)


def record(dry):
    mix = signal.sosfilt(signal.ellip(8, .2, 60, 15800, fs=SR, output="sos"), dry)
    return low_pass(mix)


dry = scene()
out = record(dry)
master_out(out)
```